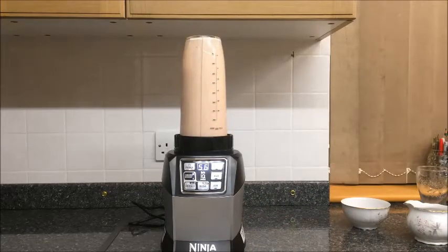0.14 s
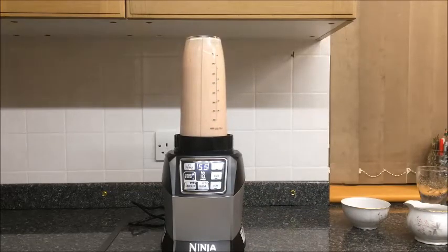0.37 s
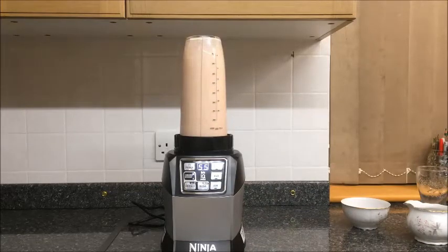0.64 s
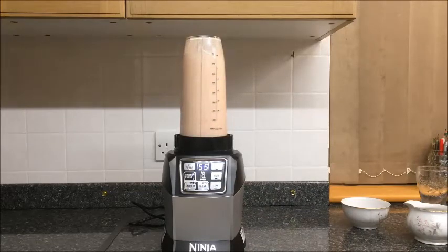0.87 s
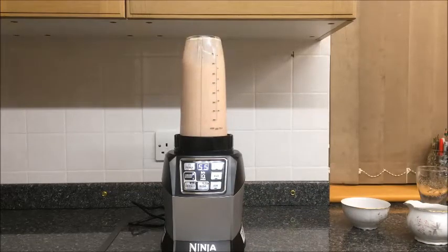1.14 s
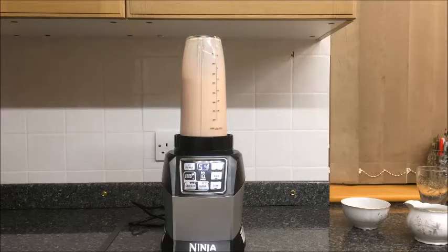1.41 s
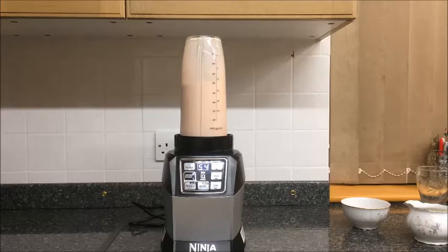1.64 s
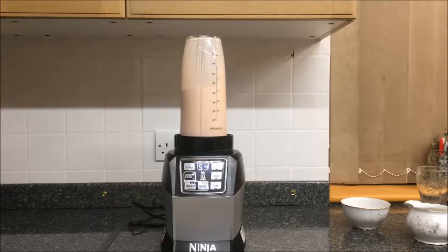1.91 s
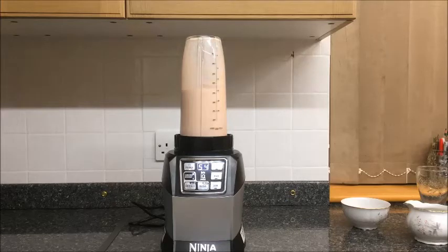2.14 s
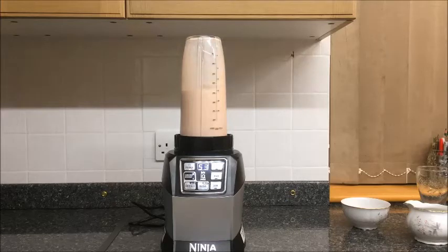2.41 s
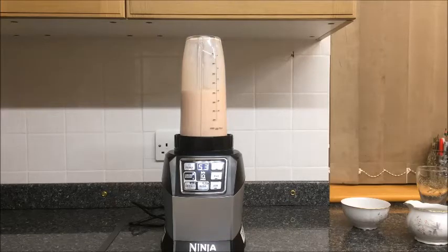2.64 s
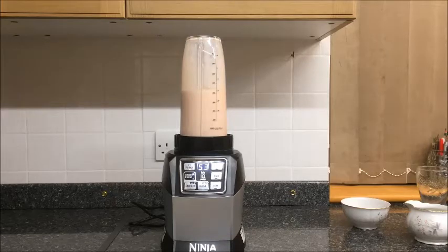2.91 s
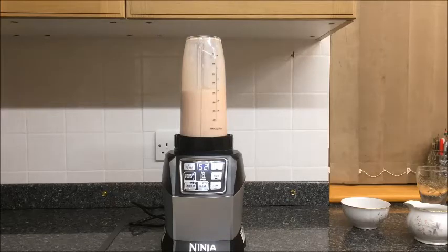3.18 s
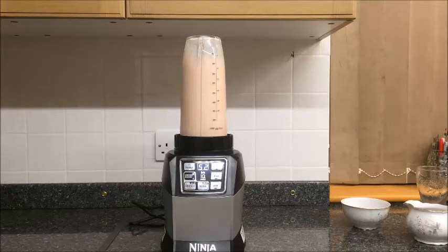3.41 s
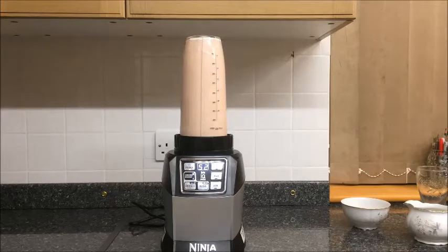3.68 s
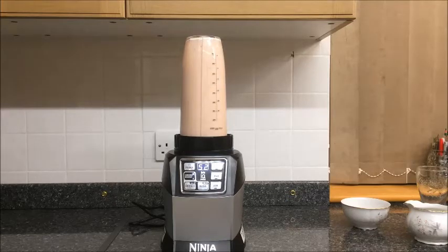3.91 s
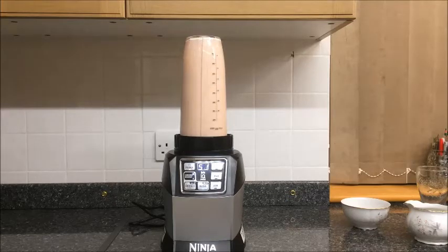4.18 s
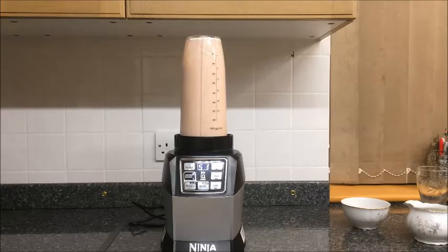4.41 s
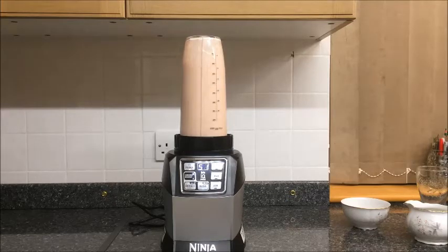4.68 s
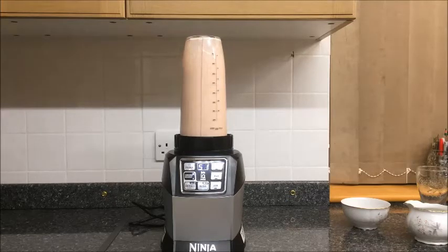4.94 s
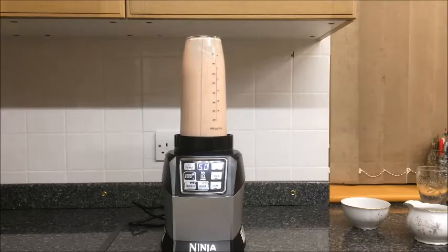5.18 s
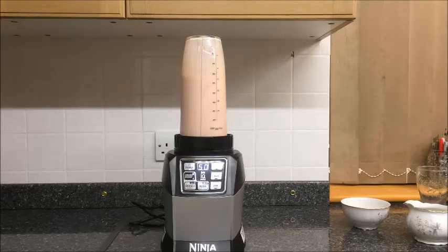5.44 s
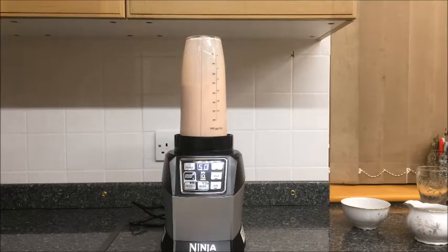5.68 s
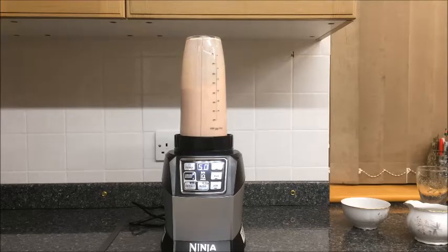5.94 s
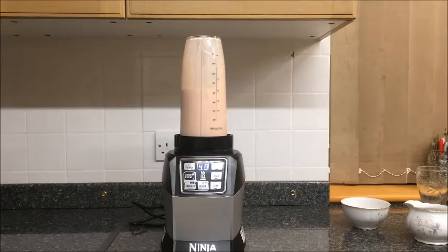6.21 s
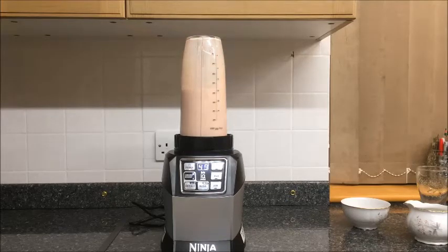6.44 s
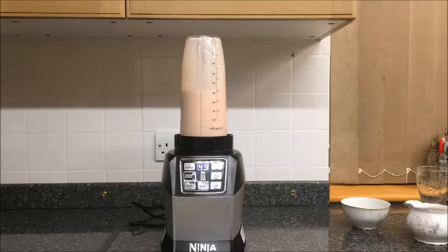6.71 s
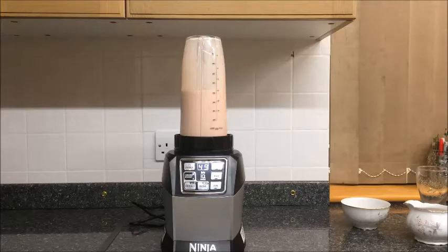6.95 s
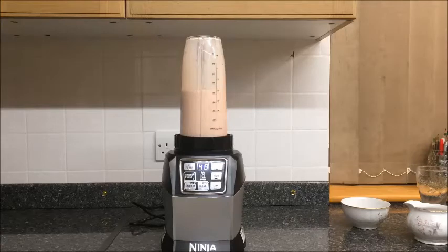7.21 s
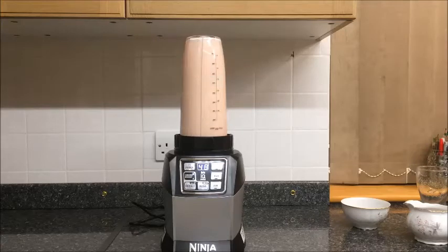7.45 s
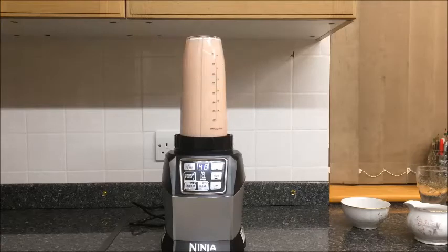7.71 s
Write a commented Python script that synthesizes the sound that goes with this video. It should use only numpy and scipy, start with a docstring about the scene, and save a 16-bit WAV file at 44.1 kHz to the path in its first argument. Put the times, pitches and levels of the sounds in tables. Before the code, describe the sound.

Loud pulses of a kitchen blender churning thick liquid, each starting with a hard rattling jolt, separated by quiet refrigerator hum.

```python
"""A cup blender, already running on a stone kitchen counter, coasts to a stop, rests, jolts into a second
pulse, coasts and rests again, then starts a third. A fridge hums and its compressor buzzes in the rests.
The shaft hums at its turning rate; noise bands follow speed and swirl through cup and base resonances.
Knocks ring cup modes, the whine is a wavering tone, and a short dense tail gives the room."""
import sys
import numpy as np
from scipy import signal
from scipy.fft import rfft, irfft
from scipy.io import wavfile
from scipy.ndimage import uniform_filter1d

SR = 44100
rng = np.random.default_rng(int(sys.argv[2]) if len(sys.argv) > 2 else 0)


def output_pcm(signal):
    """Save a mono or channel-first signal as 16-bit PCM at the path in sys.argv[1].

    Samples are clipped to [-1, 1] before scaling.
    """
    pcm = np.clip(np.atleast_2d(signal).T, -1, 1) * 32767
    wavfile.write(sys.argv[1], SR, np.round(pcm).astype(np.int16))


def makeup_ratio(level_db):
    """Linear amplitude ratio for a level in decibels (20 dB per factor of ten)."""
    decades = np.asarray(level_db, float) / 20
    return 10 ** decades


N = 345744
T = np.arange(N) / SR
FREQ = np.arange(N // 2 + 1) * SR / N + 1e-9
RUN_S = 1.5  # power stays on this long in each pulse


def unit(x):
    """Scale to rms 1."""
    return x / np.sqrt(np.mean(x ** 2))


def white():
    """White noise of rms 1."""
    return rng.standard_normal(N)


def shape(x, gain):
    """Filter by a gain for every frequency."""
    return irfft(rfft(x) * gain, N)


def colour(points):
    """Gain that joins (frequency [Hz], level [dB]) points on a log frequency axis."""
    hz, db = np.transpose(points)
    return makeup_ratio(np.interp(np.log(FREQ), np.log(hz), db))


def resonance(hz, width_hz):
    """A single causal mode, gain 1 at its centre."""
    return 1 / (1 + 1j * (FREQ / hz - hz / FREQ) * hz / width_hz)


def modes(table):
    """Gain turning white noise of rms 1 into steep squared resonances, each with its table level as rms."""
    gain = 0
    for hz, width_hz, db in table:
        band = resonance(hz, width_hz) ** 2
        gain = gain + makeup_ratio(db) * band / np.sqrt(np.mean(np.abs(band) ** 2))
    return gain


def walk(rate_hz):
    """Random levels held 1 / rate_hz and slewed twice, rms 1."""
    hold = int(SR / rate_hz)
    steps = np.repeat(rng.standard_normal(N // hold + 1), hold)
    return unit(uniform_filter1d(uniform_filter1d(steps, hold), hold)[:N])


def decay(start_s, t60_s):
    """Envelope that jumps to 1 and decays exponentially, 60 dB in t60_s."""
    age = T - start_s
    return (age >= 0) * np.exp(-np.log(1000) * np.maximum(age, 0) / t60_s)


def bumps(table):
    """Sum in dB of bell-shaped (centre [s], level [dB], spread [s]) swells and dips."""
    return sum(db * np.exp(-.5 * ((T - s) / spread_s) ** 2) for s, db, spread_s in table)


def kitchen_air():
    """Steady noise with the broad colour of the kitchen."""
    # air spectrum: (frequency [Hz], relative density [dB per Hz])
    air_colour = [(15, -54), (25, -21.5), (86, -7), (148, -5.5), (233, -1.5), (305, -9), (683, -12),
                  (996, -20), (2620, -28), (3620, -25.5), (4140, -31), (15500, -41.5)]
    return makeup_ratio(-58.5) * unit(shape(white(), colour(air_colour)))


def fridge():
    """Narrow hums and tones; compressor strokes, strong and weak in turn, buzz in shell and treble."""
    # hum bands: (frequency [Hz], width before squaring [Hz], level [dB])
    hum_bands = [(49, 6, -73), (164, 30, -67.5), (424, 20, -69.5), (686, 11, -70.5), (911, 8, -77.5)]
    # steady pitches: (frequency [Hz], mean level [dB])
    tones = [(99.6, -60.5), (230.7, -60)]
    # shell bands: (frequency [Hz], width before squaring [Hz], level [dB])
    shell_bands = [(2180, 130, -82.5), (2820, 40, -90), (3400, 120, -83.5), (3487, 120, -78),
                   (3680, 62, -74), (3900, 120, -85.5), (4214, 60, -89.5), (4505, 80, -82.5),
                   (5390, 160, -91), (6320, 60, -90), (6850, 40, -95), (8140, 90, -91.5), (8565, 40, -93)]
    compressor_hz = 49.22

    hum = shape(white(), modes(hum_bands))
    for hz, db in tones:
        hum = hum + makeup_ratio(db + 1.5 * walk(6)) * np.sqrt(2) * np.sin(2 * np.pi * hz * T)

    strokes, period = np.zeros(N), round(SR / compressor_hz)
    strokes[::period] = 1
    strokes[::2 * period] = .45
    # every stroke gets the same noisy smear
    smear = rfft(white() * decay(0, .12))
    buzz = unit(shape(strokes, smear * resonance(6000, 7000)))
    shell = shape(.6 * unit(strokes) + .8 * white(), modes(shell_bands))
    return hum + makeup_ratio(-84) * buzz + shell


def room(x, t60_s=0.41, wet_db=-6):
    """Tiles and cupboards return a dense short tail."""
    tail = white() * decay(0.0053, t60_s)
    echo = rfft(tail / np.sqrt(np.sum(tail ** 2)), 2 * N)
    wet = irfft(rfft(x, 2 * N) * echo)[:N]
    return (x + makeup_ratio(wet_db) * wet) / np.sqrt(1 + makeup_ratio(2 * wet_db))


def relay():
    """The relay gives thin ticks: decaying noise in a high band."""
    # ticks: (time [s], drive before the band filter [dB])
    ticks = [(3.322, -44), (7.33, -53)]
    burst = sum(makeup_ratio(db) * decay(s, .03) for s, db in ticks) * white()
    return shape(burst, makeup_ratio(13.5) * resonance(11500, 2500) ** 2)


def knocks():
    """The cup knocks its seat: dull knocks ring its lowest mode, sharp ones the rest plus a noisy rasp."""
    # knocks: (time [s], drive [dB], sharpness [0-1])
    jolts = [(.605, -18, 0.06), (.81, -18, .1), (1.21, -22.5, 0), (1.36, -28.5, 0.03), (1.478, -37.5, 0.13),
             (3.31, -16.5, 0.77), (3.318, -15, 0.56), (3.335, -20, 0.55), (3.347, -23, .7),
             (5.39, -32, .05), (7.316, -22, 1), (7.324, -17.5, 0.95), (7.332, -17.5, .9), (7.343, -19, 1),
             (7.35, -16, 1), (7.357, -17, 1), (7.364, -18, .9), (7.378, -22, 1), (7.4, -22, 0.65)]
    # cup modes: (frequency [Hz], relative level [dB], t60 [s])
    cup_modes = [(705.6, -0.5, 0.13), (790, -9.5, .06), (1066, -3, 0.059), (1145, -3, 0.06),
                 (1420, -10.5, .03), (3500, -18, .02)]
    out, age = np.zeros(N), T[:SR // 4]
    push = 1 - np.exp(-age / 0.0012)
    for s, db, sharp in jolts:
        shares = [1 - sharp] + [sharp] * (len(cup_modes) - 1)
        ring = 0
        for (hz, mode_db, t60_s), share in zip(cup_modes, shares):
            tone = np.sin(2 * np.pi * (hz * age + rng.random()))
            ring = ring + share * makeup_ratio(mode_db - 60 * age / t60_s) * tone
        out[int(s * SR):][:len(age)] += makeup_ratio(db) * push * ring

    rasp = sum(sharp ** 3 * makeup_ratio(db) * decay(s, 0.05) for s, db, sharp in jolts) * white()
    rasp_gain = makeup_ratio(1.5) * resonance(3500, 1700) ** 2 + makeup_ratio(-27) * resonance(8000, 9000)
    return out + shape(rasp, rasp_gain)


def motor():
    """Shaft speed [Hz], swirl as a share of its top, seconds powered so far, and power [0-1]."""
    # pulses: (switch-on time [s], top speed [Hz], coasting time [s])
    pulses = [(-.705, 242, .77), (3.31, 251, .85), (7.317, 244, .8)]
    # run-up: (time since switch-on [s], share of top speed)
    spin_up = [(0, 0), (.07, .02), (.19, .54), (.29, .78), (.46, .87), (.56, .96), (1.0, .98), (1.5, 1)]
    coast_bend = 1.45  # above 1: blades lose speed fastest at first; swirl slows evenly
    grip_s = .03  # the drive takes hold and lets go
    hz, swirl, ran_s, powered = 0, 0, 0, 0
    for on_s, top_hz, coast_s in pulses:
        age = T - on_s
        left = np.clip(1 - (age - RUN_S) / coast_s, 0, 1)
        spin = np.interp(age, *np.transpose(spin_up))
        hz = hz + top_hz * spin * left ** coast_bend
        swirl = swirl + spin * left
        ran_s = ran_s + (left > 0) * np.clip(age, 0, RUN_S)
        powered = powered + np.clip(age / grip_s, 0, 1) * np.clip(1 - (age - RUN_S) / grip_s, 0, 1)
    return hz, np.clip(swirl, 0, 1), ran_s, powered


def squared_band(hz, width_hz):
    """Noise of rms 1 through a squared resonance."""
    return unit(shape(white(), resonance(hz, width_hz) ** 2))


def rocking(hz, swirl, powered):
    """Counter shudders near one shaft speed; coasting adds a thin seal hiss and a bearing whirr."""
    rock_at_hz, rock_span_hz = 98, 26
    powered_db, coasting_db = -33, -53
    near = np.exp(-.5 * ((hz - rock_at_hz) / rock_span_hz) ** 2)
    shudder_level = makeup_ratio(powered * powered_db + (1 - powered) * coasting_db)
    shudder = near * shudder_level * squared_band(80, 69)
    seal_hiss = near * makeup_ratio(-56) * squared_band(11500, 4000)
    whirr = swirl * makeup_ratio(-50) * squared_band(7300, 600)
    return shudder + (1 - powered) * (seal_hiss + whirr)


def whine():
    """A thin motor band follows its own pitch and flickers: slow noise carried on a tone."""
    # glides: (start [s], length [s], from [Hz], to [Hz], level before sag and flicker [dB])
    glides = [(-.1, .4, 2075, 2105, -26), (4.8, .3, 2080, 2095, -32), (.42, .48, 1925, 2015, -25),
              (3.9, .9, 1960, 2045, -25), (7.65, .3, 1985, 2015, -33)]
    rise_s, sag_db_per_s = .14, 12
    out = 0
    for s, length_s, from_hz, to_hz, db in glides:
        end_s = s + length_s
        phase = 2 * np.pi * np.cumsum(np.interp(T, [s, end_s], [from_hz, to_hz])) / SR
        fade = np.interp(T, [s - .1, s + rise_s, end_s, end_s + .1], [0, 1, 1, 0])
        level = makeup_ratio(db - sag_db_per_s * np.maximum(T - s - rise_s, 0))
        flicker = (1.1 + .55 * walk(30)) * np.sin(phase) + .55 * walk(30) * np.cos(phase)
        out = out + fade * level * flicker
    return out


def shaft(hz, powered):
    """The unbalanced shaft hums at its turning rate with a weak third harmonic; load makes it waver."""
    # passage through base and counter: (shaft speed [Hz], level [dB])
    hum_path = [(150, -62), (180, -40), (200, -24.5), (216, -23), (230, -28), (241, -27.5), (252, -33)]
    # brief dips and swells: (centre [s], level [dB], spread [s])
    hum_dips = [(.09, -10, .04), (.3, -18, .06), (.63, -10, .04), (.76, 2, .04), (3.8, -11, .02),
                (4.52, -12, .08), (4.74, -8, .03), (7.73, 4, .05), (7.8, -10, .012), (7.85, -8, .02)]
    coasting_db = -5
    phase = 2 * np.pi * np.cumsum(hz * (1 + .004 * walk(30))) / SR
    path_db = np.interp(hz, *np.transpose(hum_path), left=-120)
    db = path_db + coasting_db * (1 - powered) + bumps(hum_dips)
    return makeup_ratio(db) * np.sqrt(2) * (np.sin(phase) + makeup_ratio(-18) * np.sin(3 * phase))


def body():
    """Gain of the machine's broad colour, lifted at the modes of cup, base and counter."""
    # broad colour: (frequency [Hz], relative density [dB per Hz])
    machine_colour = [(18, -67), (30, -29.5), (243, -5.5), (491, -15.5), (727, -5), (1290, -7), (2020, -7),
                      (2240, -8), (3400, -4), (4410, -11), (5730, -11), (11600, -22), (15500, -28.5)]
    # body modes: (frequency [Hz], width [Hz], lift [dB])
    body_modes = [(97, 7.9, 8), (150, 20, 6), (201, 20, 10), (265, 28, 7), (402, 40, 9.5), (600, 57, 2.5),
                  (720, 35, 6), (1010, 40, 4.5), (1080, 30, 5), (1148, 22, 4.5), (1199, 17, 2.5),
                  (1930, 40, 6), (1995, 48, 7), (2096, 30, 10), (2350, 40, 4), (2590, 30, 6), (2651, 30, 5),
                  (2970, 35, 7), (3168, 45, 8), (3520, 60, 7), (3800, 50, 4.5), (3920, 110, 4.5),
                  (4980, 120, 2.5), (5750, 50, 6), (7306, 500, 1), (11350, 330, 4.5)]
    gain = colour(machine_colour)
    for hz, width_hz, db in body_modes:
        gain = gain * (1 + (makeup_ratio(db) - 1) * resonance(hz, width_hz))
    return gain


def roar(swirl, ran_s, powered):
    """Body-filtered noise bands (thrum, liquid, low and high rattle, fan air) follow swirl and flutter."""
    # edges between adjacent layers: frequency [Hz]
    edges_hz = [30, 450, 1600, 2400, 4400, 16000]
    # layers: (level at top speed, mid-run [dB], loss towards standstill powered [dB],
    # the same coasting [dB], sag [dB per s], share of each surge)
    layers = [(-32.5, -2, -5.5, 3.5, .2), (-26.3, 5, -4, 3.6, .1), (-23.3, 23, 8, 3, 1),
              (-21.6, 23.5, 17, 3, .8), (-24.3, 23.5, 10, 5.8, .2)]
    # lumps of mix at the blades, mostly swells: (centre [s], level [dB], spread [s])
    surges = [(.02, 3, .04), (.27, 3, .04), (.55, 2, .03), (.74, 4, .03), (3.68, 3, .06), (3.96, 4, .04),
              (4.26, 3, .05), (4.47, 2, .04), (4.77, 2, .04), (7.72, 3, .05), (7.84, -3, .03)]
    surge_flutter_db = [1.4, 0.7, 0.8, 1.2, .5]
    own_flutter_db = [1.1, 1.7, 1.8, 2.1, 0.63]
    stall_power = 1.25  # coasting, every layer also dies with the swirl to this power
    fling_share, fling_span, fling_db = .7, .12, 3  # powered mix flung up the cup near this swirl
    out, surge, lump_db, ring = 0, walk(9), bumps(surges), body()
    presence = powered + (1 - powered) * swirl ** stall_power
    for k, (top_db, powered_db, coasting_db, sag_db_per_s, lump_share) in enumerate(layers):
        lo, hi = edges_hz[k], edges_hz[k + 1]
        band = 1 / np.sqrt((1 + (lo / FREQ) ** 12) * (1 + (FREQ / hi) ** 12))
        loss_db = (powered * powered_db + (1 - powered) * coasting_db) * (1 - swirl)
        sag_db = sag_db_per_s * (ran_s - RUN_S / 2)
        gain = presence * makeup_ratio(top_db - loss_db - sag_db + lump_share * lump_db)
        if k == 1:  # churning liquid
            gain = gain * makeup_ratio(fling_db * powered * np.exp(-.5 * ((swirl - fling_share) / fling_span) ** 2))
        flutter = makeup_ratio(surge_flutter_db[k] * surge + own_flutter_db[k] * walk(40))
        out = out + gain * unit(shape(white() * flutter, ring * band))
    return out


def scene():
    """Blender in its room over the fridge and the kitchen air, the same in both channels."""
    hz, swirl, ran_s, powered = motor()
    background = kitchen_air() + fridge()
    reverberant = room(relay() + knocks() + whine() + roar(swirl, ran_s, powered))
    mono = background + reverberant + rocking(hz, swirl, powered) + shaft(hz, powered)
    return np.array([mono, mono])


def top_cut(x):
    """Nothing passes above the cut-off."""
    return signal.sosfilt(signal.butter(12, 15620, fs=SR, output="sos"), x)


def record(dry):
    """A mono microphone signal with its top cut off steeply at 15.6 kHz."""
    low_pass = signal.ellip(10, .2, 70, 15600, fs=SR, output="sos")
    mix = signal.sosfilt(low_pass, dry)
    return top_cut(mix)


dry = scene()
out = record(dry)
output_pcm(out)
```